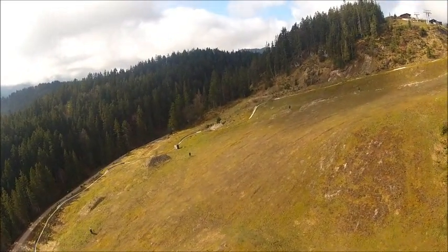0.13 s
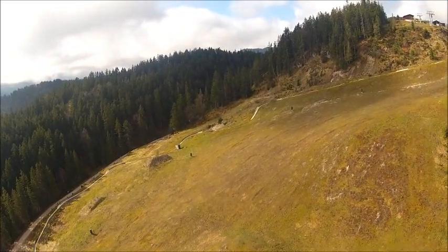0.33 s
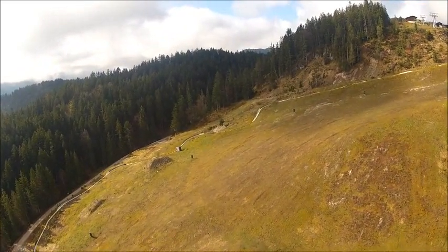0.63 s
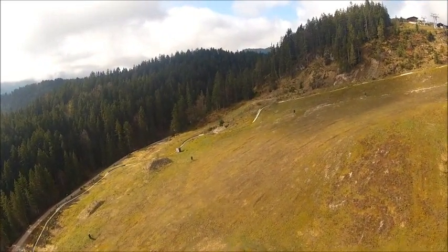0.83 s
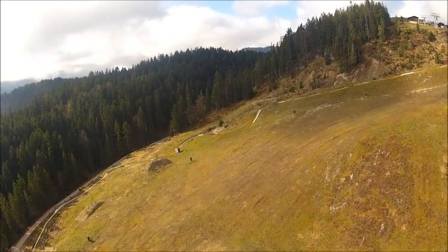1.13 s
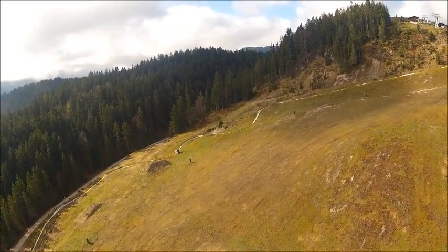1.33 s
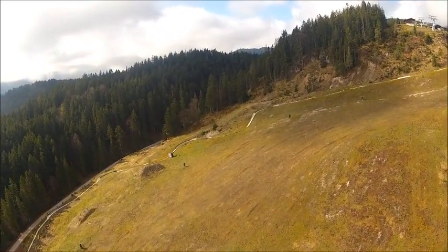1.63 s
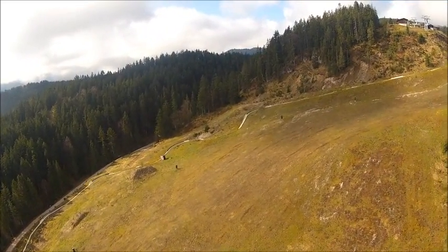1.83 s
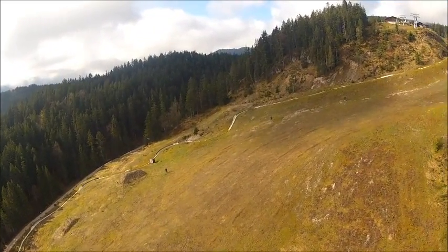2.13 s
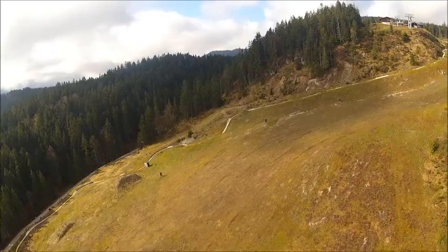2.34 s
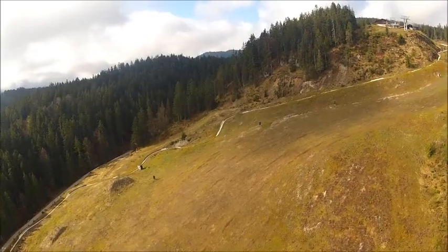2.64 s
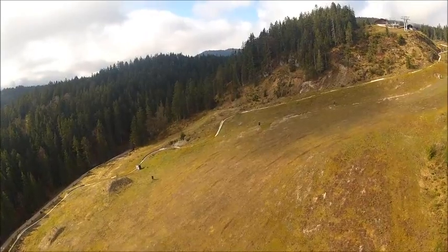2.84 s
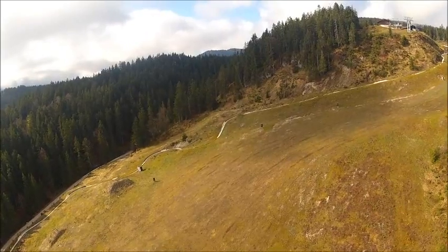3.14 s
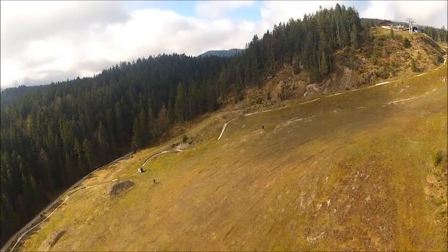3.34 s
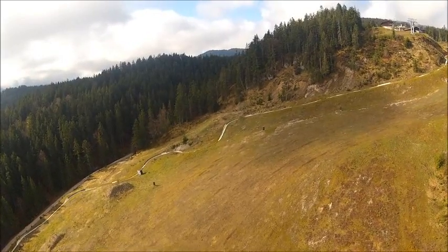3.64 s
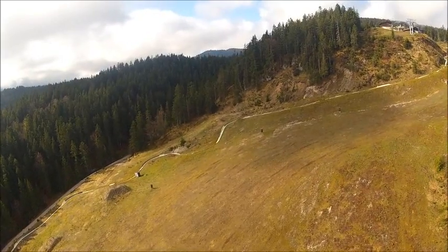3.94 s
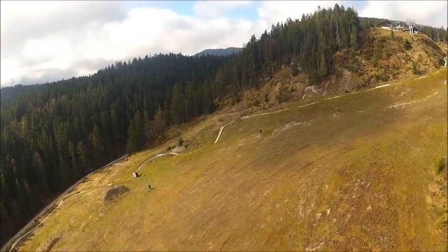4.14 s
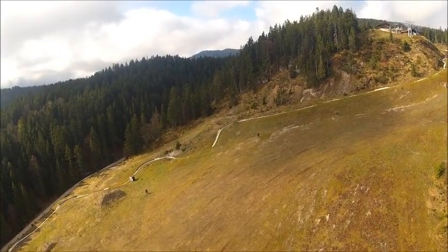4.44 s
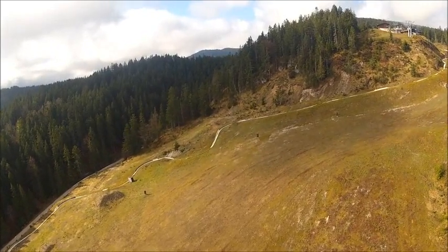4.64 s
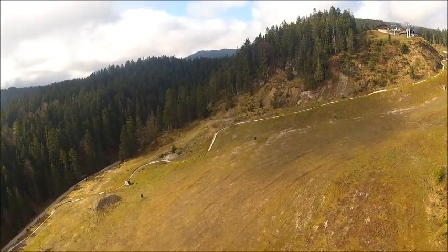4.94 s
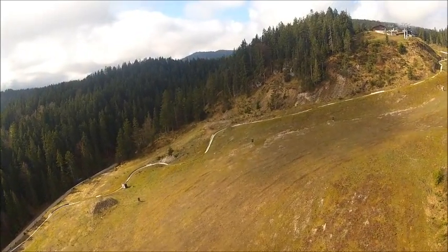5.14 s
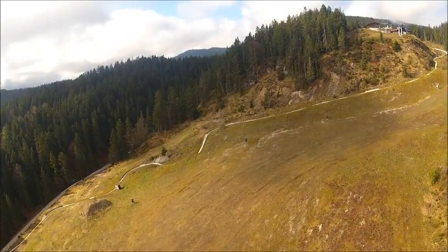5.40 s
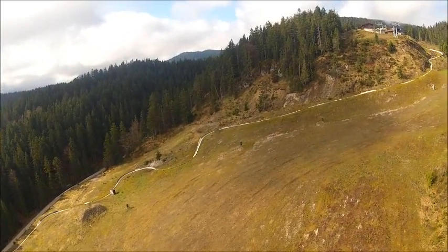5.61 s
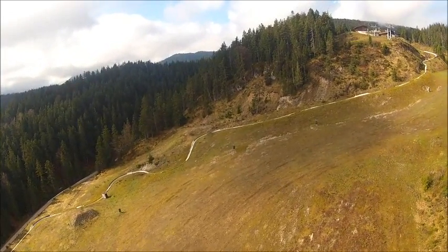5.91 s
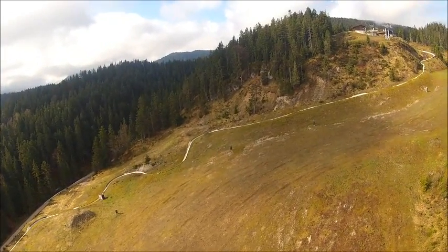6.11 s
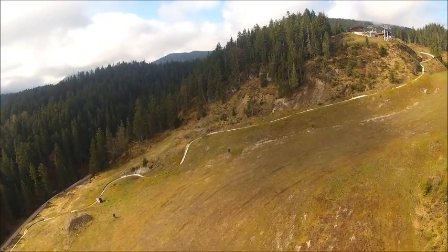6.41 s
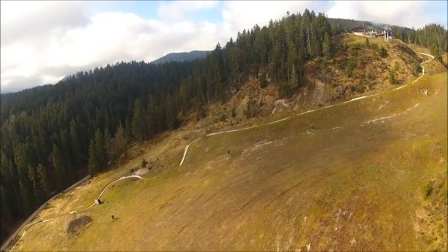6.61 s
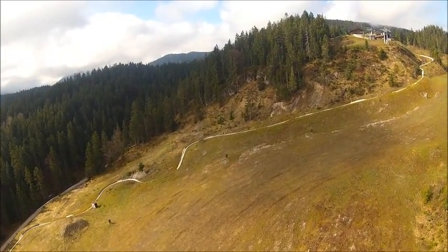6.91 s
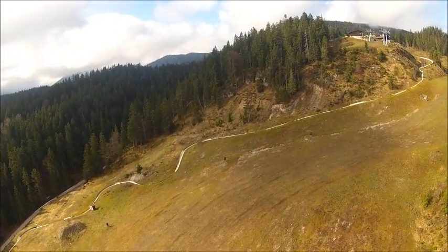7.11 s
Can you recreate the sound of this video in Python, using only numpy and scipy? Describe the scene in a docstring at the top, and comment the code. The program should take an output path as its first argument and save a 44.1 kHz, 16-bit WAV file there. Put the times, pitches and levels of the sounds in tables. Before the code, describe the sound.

From the first instant to the end at about 7.25 seconds, a quadcopter drones in steady flight, heard very close from its own small camera in open air. The nearest rotor gives a low, rough hum with a stronger blade tone an octave up; three faster rotors beat unevenly above it. A thin, gritty motor whine near 4 kHz wavers with bright hiss and a harsh mirrored edge higher up. The whine flares briefly near 0.1, 0.9, 1.5, 1.9 and 6.8 seconds. Early on, pitch wobbles slightly as motors adjust, most around 1.5 to 2.7. Gusty air buffets the microphone, with scattered knocks from 0.2 and a dense, spitting cluster at 2.5 to 2.7. Wind eases from 4 to 5.3, while hiss brightens near 5. Gusts return, with sharper knocks near 6.2, 6.5 and 7.1. The drone continues to the end without fading.

```python
"""A rough hum with a whine near 4 kHz: a quadcopter in flight, heard from the small camera it carries.
The nearest, slower rotor hums through the frame; three faster rotors beat against each other.
Eddies in the propeller wash knock and buffet the microphone, over gusty noise and a bright hiss.
The camera samples at a low rate and holds each sample, which mirrors the whine upward."""
import sys
import numpy as np
from scipy import signal
from scipy.fft import rfft, irfft, next_fast_len
from scipy.io import wavfile

SR = 44100
rng = np.random.default_rng(int(sys.argv[2]) if len(sys.argv) > 2 else 0)


def bounce(signal):
    """Save signal as a 16-bit WAV file at the path given by the first command-line argument."""
    frames = np.transpose(np.atleast_2d(signal))
    limited = np.clip(frames, -1, 1)
    pcm = np.round(limited * 32767).astype(np.int16)
    wavfile.write(sys.argv[1], SR, pcm)


N = 320166
TIME = np.arange(N) / SR  # seconds
MOTOR_ORDER = 28  # motor whine cycles per turn of the rotor

# Steering: the rotor closest to the camera slows when the far ones speed up.
# (time [s], speed [turns per s])
NEAR_SPEED = [(0.0, 116.4), (0.47, 114.7), (1.36, 114.2), (1.69, 112.7), (1.8, 111.0), (2.4, 114.6),
              (2.56, 114.2), (2.91, 116.0), (4.02, 113.2), (4.52, 113.3), (4.77, 114.9), (4.86, 114.1),
              (5.17, 113.2), (5.95, 113.0), (6.11, 115.1), (6.74, 115.0), (6.84, 114.2), (7.25, 115.0)]
# Hum of the near rotor, before a small trim: (time [s], level [dB])
HUM_LEVEL = [(0.0, -23), (0.59, -19.1), (2.35, -20.5), (2.67, -28), (2.86, -21.5), (3.36, -22.5),
             (3.54, -19.5), (3.85, -21.5), (5.62, -21.5), (5.74, -30.5), (5.87, -20), (6.58, -23),
             (6.85, -24.9), (7.25, -19)]
# Blade tones, before trims: (time [s], near rotor level [dB], fast rotors level [dB])
BLADE_LEVELS = [(0, -20, -30), (0.5, -23, -22.5), (1.3, -22.5, -26), (1.85, -20.5, -27.5),
                (2.4, -22.5, -24.5), (3.2, -23, -25), (3.85, -19.5, -23.5), (4.4, -20.5, -26),
                (5.2, -20.5, -20.5), (6.3, -22.5, -27), (6.85, -23, -20.5), (7.26, -24, -24)]
# Buzz of the frame at three times the turning rate, before a small trim: (time [s], level [dB])
BUZZ_LEVEL = [(0.0, -36), (1.85, -49), (2.41, -35), (3.83, -27.0), (6.36, -36), (7.25, -26.5)]
# Weaker overtones of the near rotor, before trims: (multiple of turning rate, level [dB])
NEAR_ORDERS = [(6, -40), (7, -56), (8, -47), (10, -53), (12, -59), (18, -62)]
OCTAVE_DB, OCTAVE_TRADE = -32, 1.0  # average level; share of the blade tone's swing, reversed
CALM_OVERTONES = .5  # share of the gusts' swing by which upper overtones grow in calm air
SWITCHING_HZ = 7598  # rate at which the motor controller switches
SWITCHING_DB, SWITCHING_DB_PER_TURN_PER_S = -38.5, 1.3  # whine at average speed; growth with speed


def near_rotor(speed, angle, gust_db):
    """Imbalance shakes the frame once a turn, the two blades pass twice a turn."""
    (hum_db,), (buzz_db,) = in_time(HUM_LEVEL), in_time(BUZZ_LEVEL)
    blade_db, _ = in_time(BLADE_LEVELS)
    hum = from_db(hum_db + 0.95) * tone(angle, flutter_db=0.67, flutter_rate=11)
    blades = from_db(blade_db - .5) * tone(2 * angle, flutter_db=0.3, flutter_rate=5.5)
    buzz = from_db(buzz_db + 0.5) * tone(3 * angle, flutter_db=2.8, flutter_rate=16)
    # the octave of the blade tone grows as the blade tone fades
    octave_db = OCTAVE_DB - OCTAVE_TRADE * swing(blade_db)
    octave = from_db(octave_db) * tone(4 * angle, flutter_db=1.0, flutter_rate=2.2)
    # the upper overtones come out when the frame buzzes and the air is calm
    upper_db = .2 * swing(buzz_db) - CALM_OVERTONES * swing(gust_db) + 1.2
    upper = from_db(upper_db) * overtones(angle, NEAR_ORDERS, flutter_db=1.2)
    # the commutation beats with the switching, so this tone falls as the motor speeds up
    side_tone = 2 * np.pi * SWITCHING_HZ * TIME - MOTOR_ORDER * angle
    motor_db = SWITCHING_DB + SWITCHING_DB_PER_TURN_PER_S * swing(speed)
    motor = from_db(motor_db) * whine(side_tone, angle)
    return hum + blades + buzz + octave + upper + motor


# The speed that the three fast rotors share: (time [s], speed [turns per s])
FAST_SPEED = [(0, 135.9), (0.1, 136.6), (0.34, 138.5), (1.33, 138.1), (1.51, 139.4), (1.64, 138.5),
              (1.8, 140.4), (1.95, 138.0), (2.31, 136.8), (2.4, 135.6), (2.55, 138.1), (2.71, 135.7),
              (2.92, 136.9), (3.15, 138.0), (3.65, 138.0), (4.25, 137.8), (5.05, 137.9), (6.62, 137.6),
              (6.81, 138.4), (7.26, 137.9)]
# One row for each fast rotor: (usual offset from the shared speed [turns per s],
# blade tone against the shared level [dB], motor whine [dB], whine gain per extra turn per s [dB])
FAST_ROTORS = [(-1.6, -2.2, -42.5, -.3), (-.6, -7.5, -39.5, -.3), (.5, -9, -37.3, -1.0)]
# Tones of a fast rotor: (multiple of turning rate, level against its blade tone [dB])
FAST_ORDERS = [(1, -18), (2, 0), (4, -14), (6, -25), (8, -30)]
# The fast rotors fall into step and the loudest motor's whine flares up:
# (time [s], length [s], gain [dB])
FLARES = [(.08, .22, 3), (.93, .06, 6), (1.492, .04, 12), (1.557, .046, 14), (1.915, .07, 9),
          (2.24, .2, 2.5), (6.8, .16, 4)]
# The fast motors' whines fade briefly: (time [s], length [s], gain [dB])
FADES = [(.82, .14, -4), (1.52, .02, -6), (1.77, .16, -4), (2.41, .07, -8), (2.69, .06, -5)]
FLARING_ROTOR = 2  # row number in FAST_ROTORS, counted from 0
UNISON_DB = 3  # a flare of this gain halves the speed differences
TRIM_TURNS_PER_S, TRIMS_PER_S = .45, 2.0  # spread and pace of each rotor's own speed trims
WHINE_FOLLOWS = 0.42  # share of the hiss's swing that the whines take part in


def fast_rotors():
    """Three rotors at nearly one speed: their blade tones beat slowly, their motor whines quickly."""
    (shared_speed,), (hiss_db,) = in_time(FAST_SPEED), in_time(HISS_LEVEL)
    _, blades_db = in_time(BLADE_LEVELS)
    flare_db = swells(FLARES)
    common_db = WHINE_FOLLOWS * swing(hiss_db) + swells(FADES)
    apart = UNISON_DB / (UNISON_DB + flare_db)
    out = np.zeros(N)
    for k, (offset, share_db, whine_db, whine_slope_db) in enumerate(FAST_ROTORS):
        own_offset = offset + TRIM_TURNS_PER_S * drift(TRIMS_PER_S)
        speed = shared_speed + apart * own_offset
        angle = shaft_angle(speed)
        motor_db = whine_db + whine_slope_db * swing(speed) + common_db
        if k == FLARING_ROTOR:
            motor_db = motor_db + flare_db
        out += from_db(blades_db + share_db) * overtones(angle, FAST_ORDERS, flutter_db=2.8)
        out += from_db(motor_db) * whine(MOTOR_ORDER * angle, angle)
    return out


SPEED_TREMBLE = .0005  # spread, as a share of the speed


def shaft_angle(turns_per_s):
    """Angle in radians of a rotor whose speed trembles in rough air."""
    trembling = turns_per_s * (1 + SPEED_TREMBLE * drift(14.0))
    return 2 * np.pi * np.cumsum(trembling) / SR


def overtones(angle, orders, flutter_db):
    """Whole multiples of the turning rate, each shaken by the air on its own."""
    return sum(from_db(db) * tone(round(order) * angle, flutter_db, 32) for order, db in orders)


def whine(carrier, angle):
    """A motor tone; the slightly off-centre bell swells it once a turn."""
    return tone(carrier, flutter_db=1.3, flutter_rate=30) * (1 + .42 * np.cos(angle))


# Strong eddies that hit the microphone, before trims:
# (time [s], suction peak level [dB], level of the spray they shed [dB])
EDDIES = [(0.169, -9, -31), (0.314, -7, -28), (0.82, -10, -32), (1.223, -9, -29), (1.581, -7, -35),
          (1.984, -10, -31), (2.135, -9, -32), (2.511, -6, -24), (2.572, -7, -31), (2.597, -6, -23),
          (2.667, -4, -26), (3.125, -7, -32), (4.795, -6, -35), (5.433, -13, -30), (6.232, -7, -29),
          (6.51, -6, -24), (7.057, -6, -26)]
# Colour of the bright spray of noise: (frequency [Hz], relative level [dB per Hz])
SPRAY_COLOUR = [(250, -10), (700, 0), (1300, -2), (2500, -9), (5500, -17)]


def strong_eddies(core_s, suction_db, spray_db, spray_s):
    """Each is a suction pulse on the microphone inside a short burst of spray."""
    hits, bursts = np.zeros(N), np.zeros(N)
    for s, peak_db, shed_db in EDDIES:
        centre = s + .003
        hits[int(centre * SR)] = from_db(peak_db + suction_db)
        distance = np.abs(TIME - centre) / spray_s
        bursts += from_db(shed_db + spray_db) * np.exp(-np.minimum(distance, 20))
    return eddy(hits, core_s) + bursts * noise(SPRAY_COLOUR)


def eddy(hits, core_s):
    """Each hit becomes a passing vortex: a sharp suction between two soft rises in pressure."""
    u = np.arange(-600, 601) / SR / core_s  # time from the centre, in core lengths
    vortex = (u * u - 1) / (1 + u * u) ** 2
    return signal.oaconvolve(hits, vortex, "same")


def buffets(gust_db, per_s, size_db, spread_db):
    """Many small eddies of three sizes, at random times, that grow with the gusts."""
    out = np.zeros(N)
    for core_s in (.0004, .0007, .0011):
        born = rng.random(N) < per_s / SR
        chance = np.clip(rng.standard_normal(N), -2, 1)
        sizes = from_db(gust_db + size_db + spread_db * chance)
        out += eddy(born * sizes, core_s)
    return out


# Strength of the gusts at the microphone, before waves, puffs and trims: (time [s], level [dB])
GUST_LEVEL = [(0, -28), (.85, -29.5), (1.7, -30), (2.7, -27.8), (3.2, -28.5), (4.05, -32.2), (4.4, -31),
              (5.25, -35), (5.65, -30), (6.45, -26.5), (6.8, -28.5), (7.26, -29)]
# Puffs of air on top of the gusts:
# (time [s], length [s], gain of the dull wash [dB], gain of the ragged gusts [dB])
PUFFS = [(0.109, .05, 6, 4.5), (0.29, 0.051, 3, 3.5), (2.087, 0.029, 7, 0), (2.914, 0.097, -1, 2.5),
         (3.33, 0.24, 3, -1.5), (5.76, 0.079, 4, 2), (5.884, 0.026, -5, 2.5), (6.246, 0.039, -6, 1)]
# Level of the hiss, before trims: (time [s], level [dB])
HISS_LEVEL = [(0, -40.5), (.55, -38.9), (.75, -43), (1.45, -39), (1.7, -41), (2.65, -42), (3.4, -39.5),
              (4.3, -40), (4.95, -35.5), (5.6, -41), (6.15, -41.2), (6.45, -39), (7.26, -38.5)]
# Colours of the dull wash, the gusts and the hiss: (frequency [Hz], relative level [dB per Hz])
WASH_COLOUR = [(15, -40), (25, -49), (50, -22), (75, -7), (120, -2), (170, 1), (250, -1.5), (330, -3),
               (450, -7), (650, -16), (1000, -32.5), (2000, -37)]
GUST_COLOUR = [(120, -39), (300, -2), (500, -1.5), (700, -2), (1000, -5.5), (1400, -11), (2000, -15.5),
               (3000, -17), (5500, -39)]
HISS_COLOUR = [(700, -16), (1800, -8), (2600, -11), (3000, -4.5), (3400, -6), (3900, -0.5), (4500, 1),
               (5100, -0.5), (5500, -5.5), (5900, -9.5), (6500, -36)]
THROB_DB = .55  # spread of the gusts' uneven waves
WASH_DB, WASH_FOLLOWS = -20, 0.19  # level in average air; share of the gusts' swing
SPRAY_DB, SPRAY_FOLLOWS = -41, 2.3  # strong gusts turn bright: average level; times the gusts' swing
HISS_GUST_SHARE = 0.11  # share of the gusts' swing that the hiss takes


def airflow(angle, gust_db):
    """Dull wash, gusts chopped by the near rotor, their spray, small eddies, blade and bearing hiss."""
    hiss_db, = in_time(HISS_LEVEL)
    puffs = np.array(PUFFS)
    wave_db = THROB_DB * throb() + swells(puffs[:, [0, 1, 3]])
    rough_db = gust_db + wave_db
    turbulence = drift(152)
    chop = 1 + 0.25 * np.cos(angle) + 0.25 * np.cos(2 * angle)

    wash_db = WASH_DB + WASH_FOLLOWS * swing(rough_db) + swells(puffs[:, :3])
    wash = from_db(wash_db) * rms_one(noise(WASH_COLOUR) * from_db(2.0 * turbulence))

    ragged = noise(GUST_COLOUR) * chop * from_db(3.0 * turbulence)
    gusts = from_db(rough_db - 0.77) * rms_one(ragged)

    spray_db = SPRAY_DB + SPRAY_FOLLOWS * swing(rough_db)
    bright = noise(SPRAY_COLOUR) * chop * from_db(2.3 * turbulence)
    spray = from_db(spray_db) * rms_one(bright)

    swish = 1 + 0.036 * np.cos(angle) + 0.11 * np.cos(2 * angle)
    flicker_db = 1.0 * drift(150) + 0.58 * turbulence + 0.75 * drift(5.9)
    hiss_db = hiss_db + 7.0 + HISS_GUST_SHARE * swing(gust_db) + 1.25 * wave_db
    hiss = from_db(hiss_db) * rms_one(noise(HISS_COLOUR) * swish * from_db(flicker_db))

    small_eddies = buffets(gust_db, per_s=30, size_db=14.0, spread_db=2.0)
    return wash + gusts + spray + hiss + small_eddies


THROB_HZ, THROB_WIDTH_HZ = 6.0, 2.5


def throb():
    """Uneven waves: chance through a slow resonance; spread 1."""
    low, high = THROB_HZ - THROB_WIDTH_HZ, THROB_HZ + THROB_WIDTH_HZ
    return noise([(low, -20), (THROB_HZ, 0), (high, -6), (8 * THROB_HZ, -100)])


def tone(angle, flutter_db, flutter_rate):
    """A sine of rms 1 whose strength flutters."""
    start = rng.uniform(0, 2 * np.pi)
    wave = np.sin((angle + start) % (2 * np.pi), dtype=np.float32)
    return rms_one(wave * from_db(flutter_db * drift(flutter_rate)))


def noise(spectrum):
    """Noise of the given colour; rms 1."""
    size = next_fast_len(N)
    hz, db = np.transpose(spectrum)
    bins_hz = np.fft.rfftfreq(size, 1 / SR)
    gain = from_db(np.interp(np.log(bins_hz + 1), np.log(hz), db))  # +1 avoids log(0)
    return rms_one(irfft(rfft(rng.standard_normal(size)) * gain, size)[:N])


def drift(rate):
    """Smooth chance with about `rate` swings a second; spread 1."""
    # worked out at every tenth sample; the first 8000 steps let the filter settle
    r = np.exp(-20 * np.pi * rate / SR)
    chance = rng.standard_normal(N // 10 + 8002)
    slow = signal.lfilter([1], [1, -2 * r, r * r], chance)[8000:]
    return np.interp(np.arange(N) / 10, np.arange(len(slow)), rms_one(slow))


def swells(rows):
    """Gain in dB over time from rows of (time [s], length [s], gain [dB]): each a rounded swell."""
    coarse = TIME[::20]
    total_db = np.zeros(len(coarse))
    for s, length_s, db in rows:
        total_db += db * np.exp(-np.minimum((2 * (coarse - s) / length_s) ** 2, 20))
    return np.interp(TIME, coarse, total_db)


def in_time(rows):
    """Each column of a curve, at every sample."""
    s, *columns = np.transpose(rows)
    return [np.interp(TIME, s, c) for c in columns]


def swing(x):
    """Departure from the average."""
    return x - x.mean()


def from_db(db):
    """Decibels to gain."""
    return np.exp(np.asarray(db) * (np.log(10) / 20))


def rms_one(x):
    """Scale to an rms of 1."""
    return x / np.sqrt(np.mean(x ** 2) + 1e-20)


def scene():
    """Four rotors and their airflow at one microphone."""
    (speed,), (gust_db,) = in_time(NEAR_SPEED), in_time(GUST_LEVEL)
    angle = shaft_angle(speed)
    rotors = near_rotor(speed, angle, gust_db) + fast_rotors()
    knocks = strong_eddies(core_s=.00062, suction_db=1.5, spray_db=6.5, spray_s=.0025)
    return (rotors + airflow(angle, gust_db) + knocks)[None]


WIND_CUT_HZ, CAMERA_RATE_HZ, CUTOFF_HZ = 48, 12000, 15300


def record(dry):
    """The camera cuts deep rumble and holds each slow sample, mirroring sound around its sampling rate."""
    rumble_cut = signal.butter(2, WIND_CUT_HZ, "high", fs=SR, output="sos")
    lean = signal.sosfilt(rumble_cut, dry)
    # the input stage rounds the tallest peaks
    lean = lean / (1 + (lean / .95) ** 8) ** (1 / 8)
    slow = signal.resample_poly(lean, CAMERA_RATE_HZ, SR, axis=-1)
    # each slow sample is held for four fast ones
    steps = np.repeat(slow, 4, axis=-1)
    held = signal.resample_poly(steps, SR, 4 * CAMERA_RATE_HZ, axis=-1)[:, :N]
    treble_cut = signal.ellip(12, .1, 90, CUTOFF_HZ, fs=SR, output="sos")
    return signal.sosfilt(treble_cut, held)


dry = scene()
out = record(dry)
bounce(out)
```